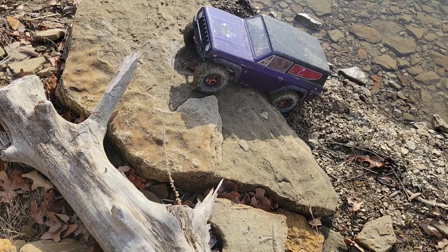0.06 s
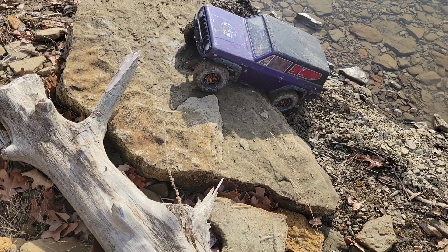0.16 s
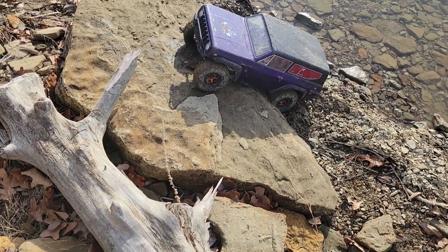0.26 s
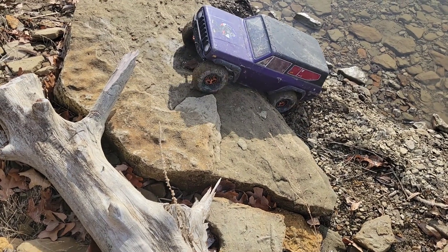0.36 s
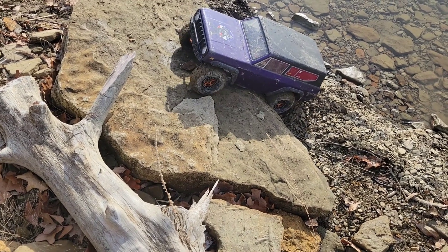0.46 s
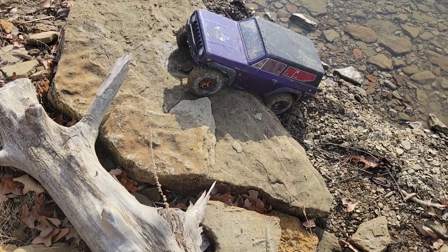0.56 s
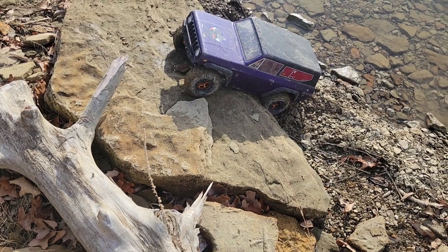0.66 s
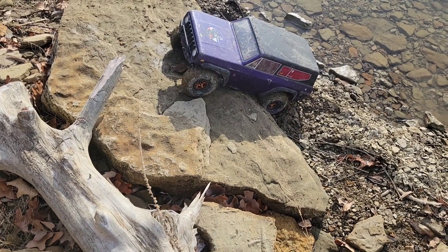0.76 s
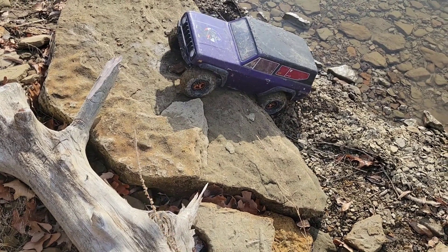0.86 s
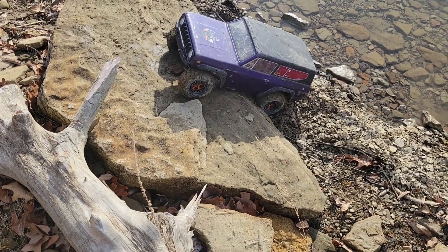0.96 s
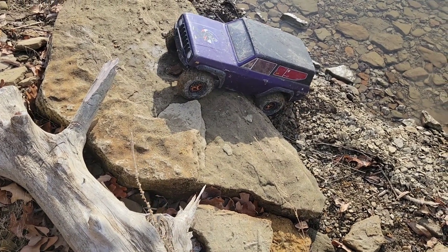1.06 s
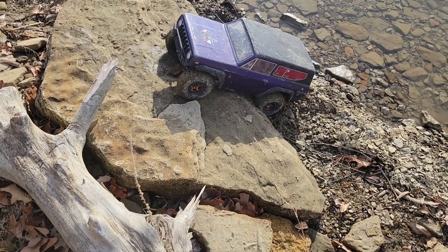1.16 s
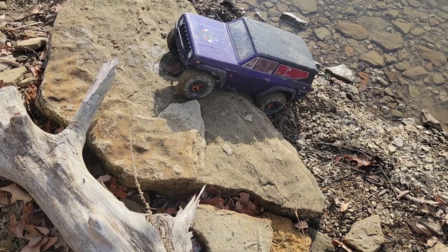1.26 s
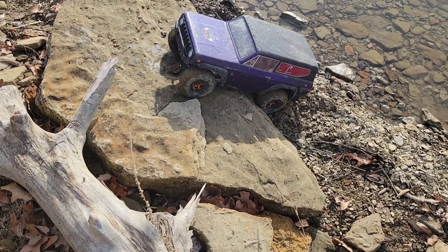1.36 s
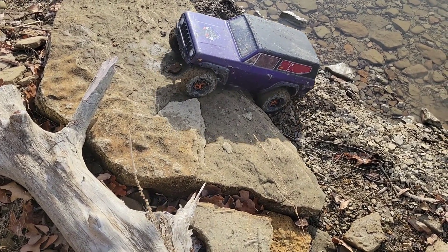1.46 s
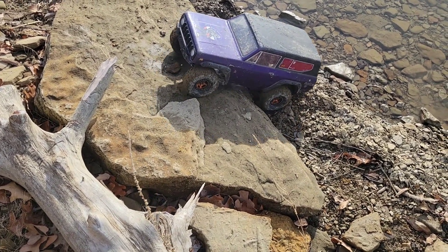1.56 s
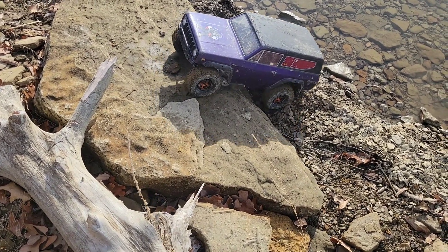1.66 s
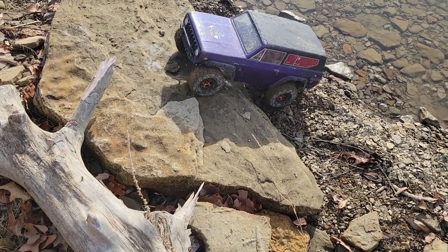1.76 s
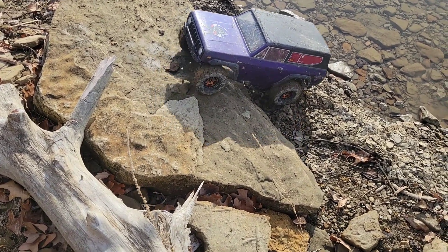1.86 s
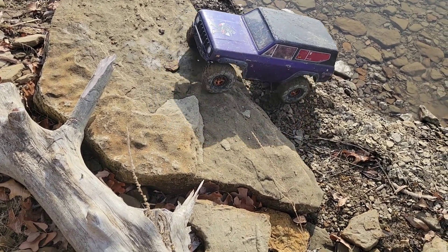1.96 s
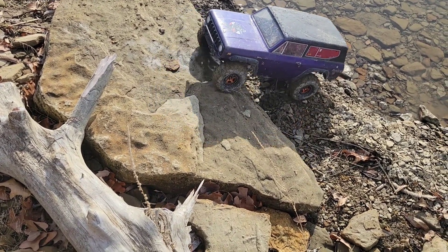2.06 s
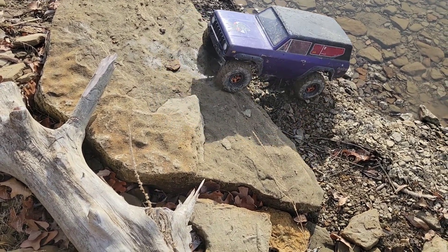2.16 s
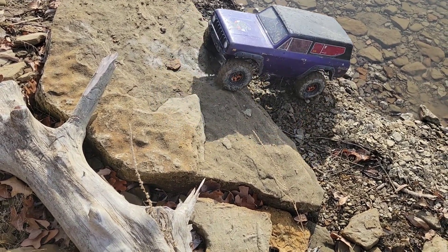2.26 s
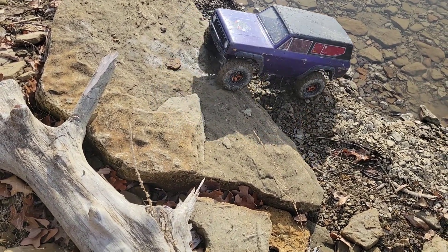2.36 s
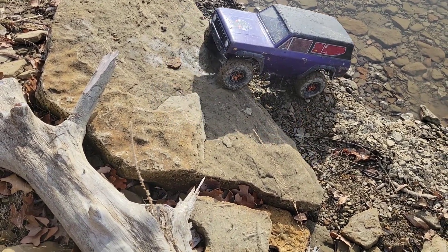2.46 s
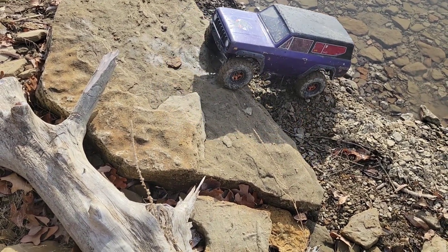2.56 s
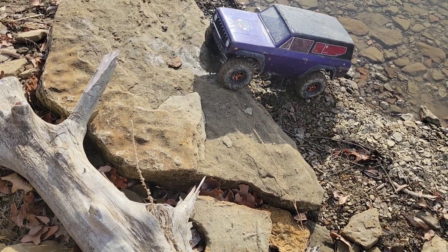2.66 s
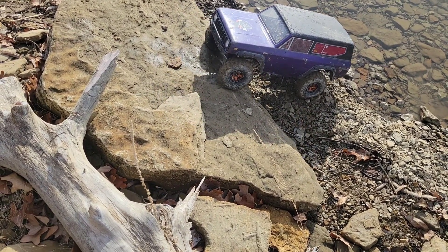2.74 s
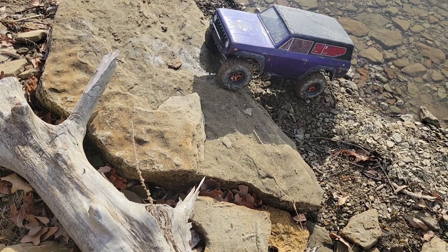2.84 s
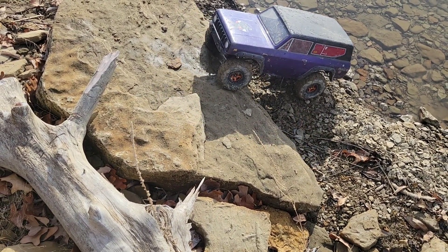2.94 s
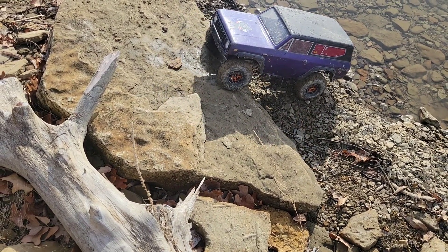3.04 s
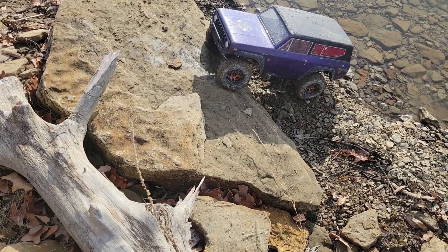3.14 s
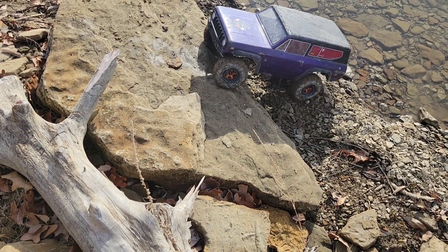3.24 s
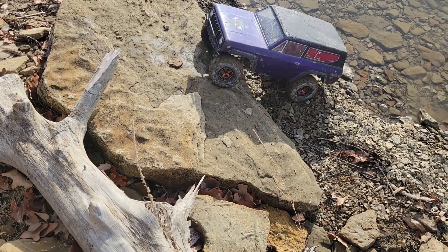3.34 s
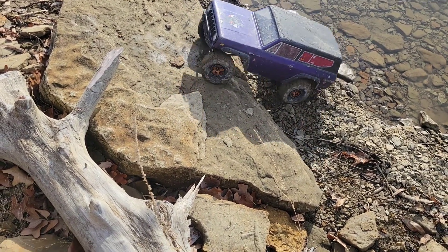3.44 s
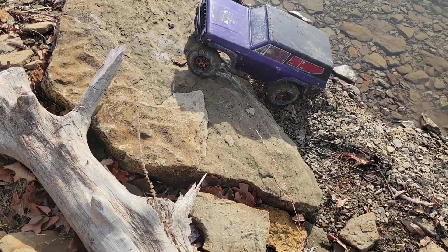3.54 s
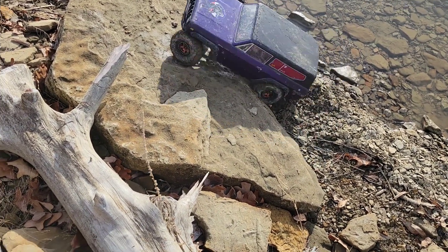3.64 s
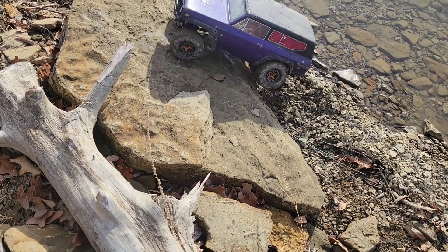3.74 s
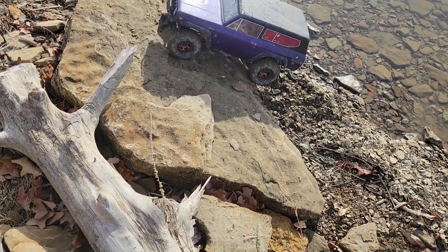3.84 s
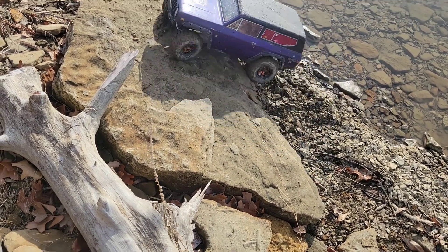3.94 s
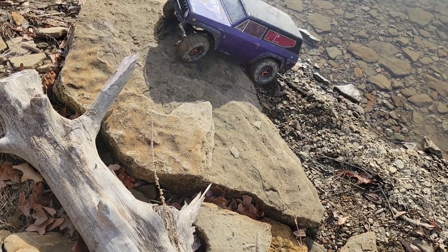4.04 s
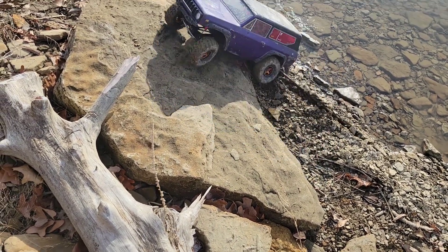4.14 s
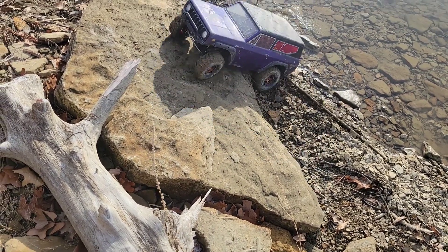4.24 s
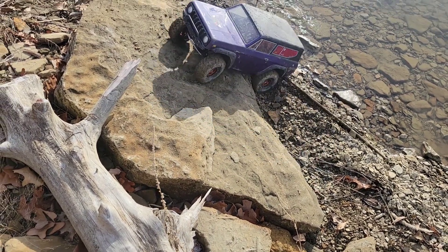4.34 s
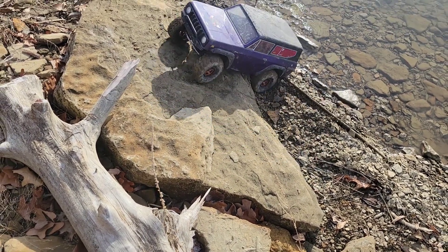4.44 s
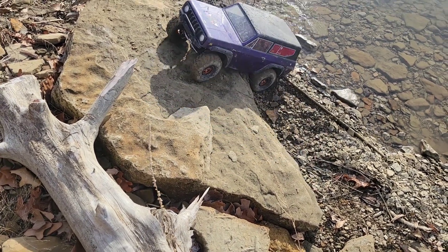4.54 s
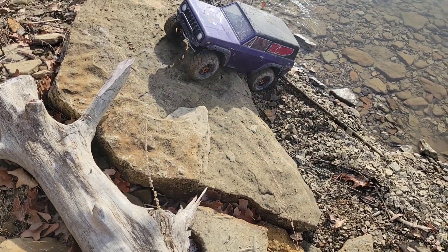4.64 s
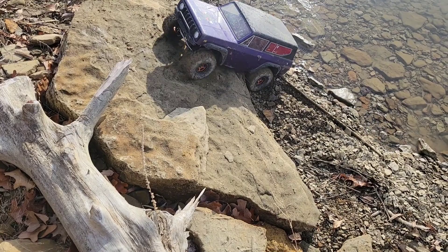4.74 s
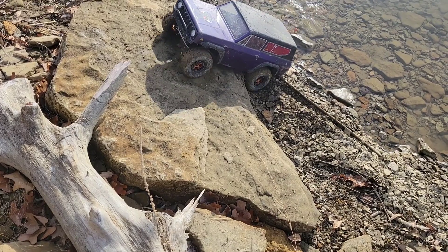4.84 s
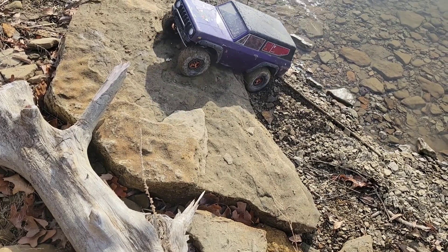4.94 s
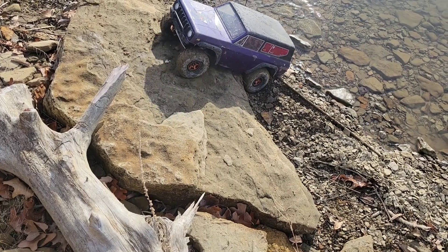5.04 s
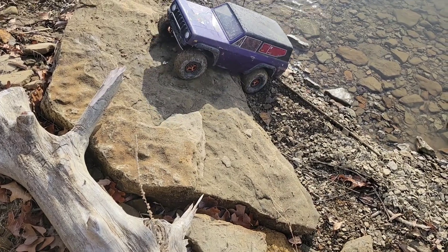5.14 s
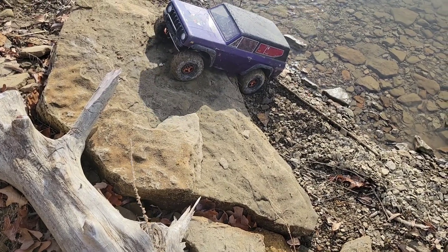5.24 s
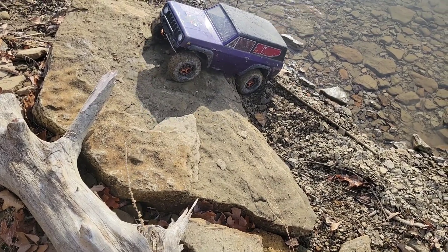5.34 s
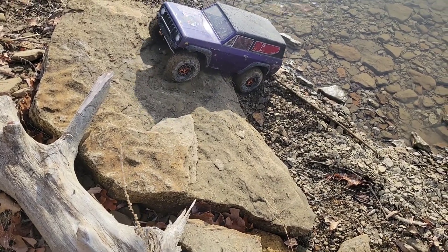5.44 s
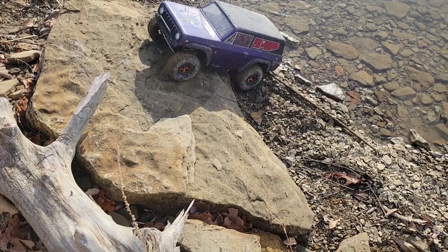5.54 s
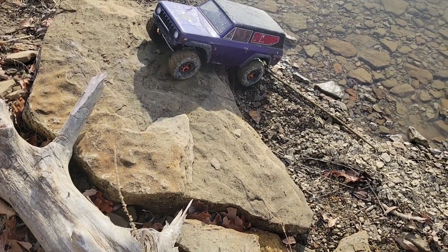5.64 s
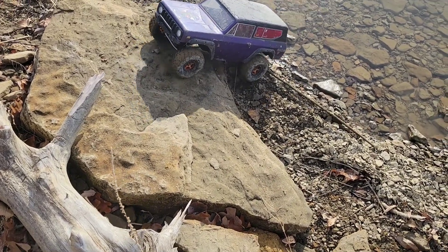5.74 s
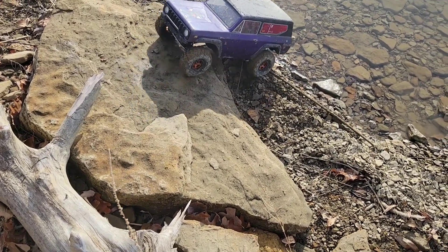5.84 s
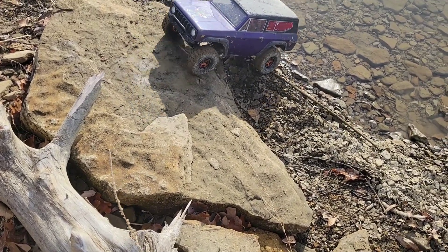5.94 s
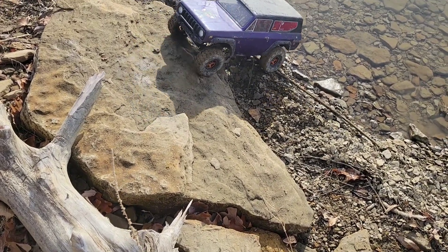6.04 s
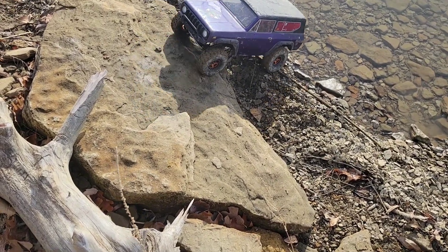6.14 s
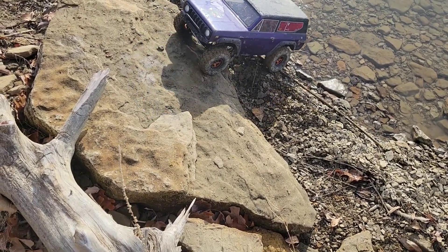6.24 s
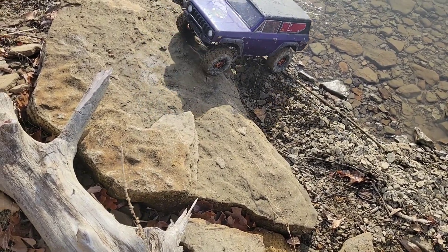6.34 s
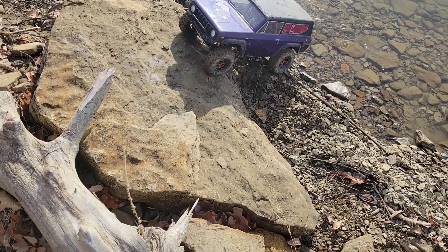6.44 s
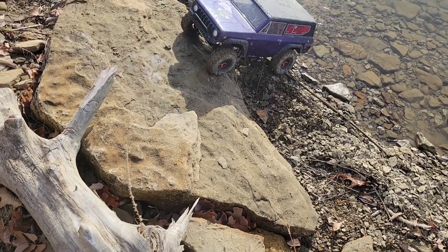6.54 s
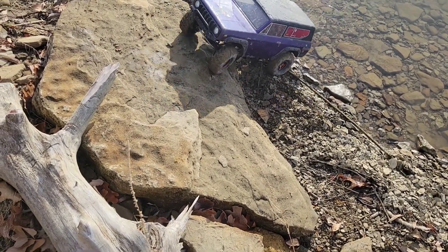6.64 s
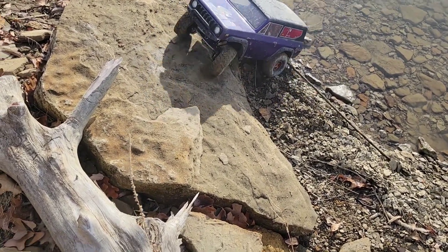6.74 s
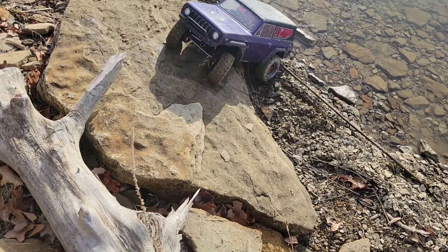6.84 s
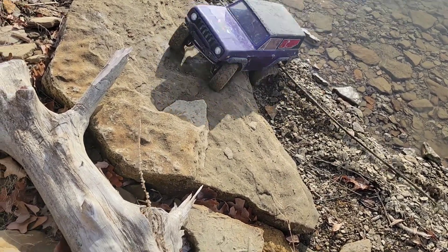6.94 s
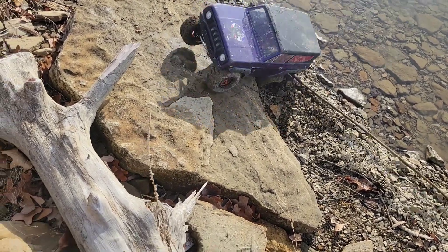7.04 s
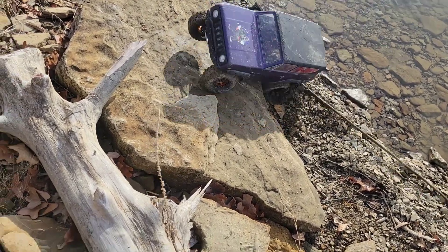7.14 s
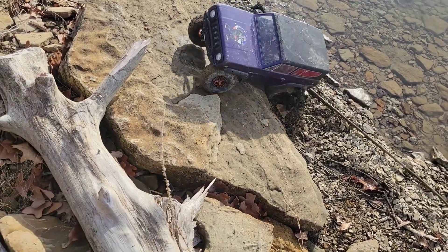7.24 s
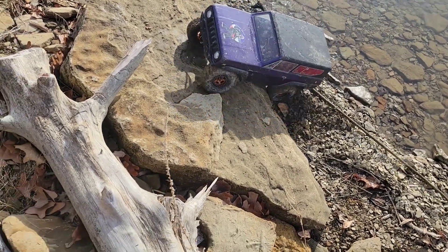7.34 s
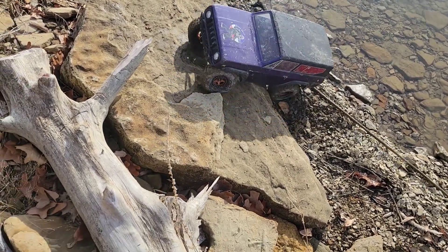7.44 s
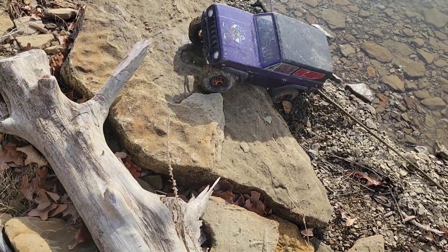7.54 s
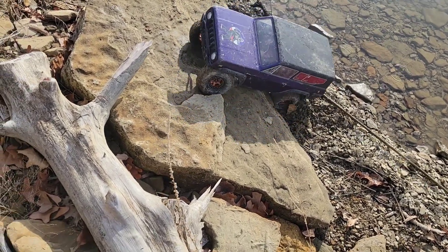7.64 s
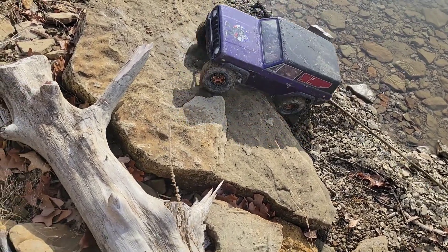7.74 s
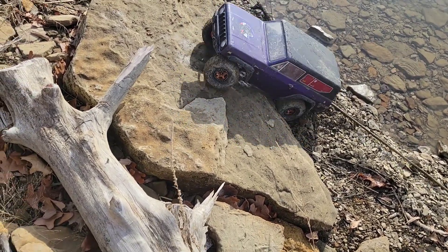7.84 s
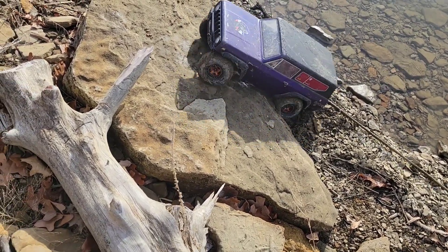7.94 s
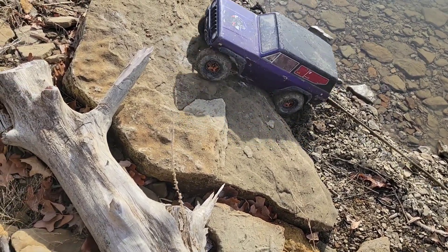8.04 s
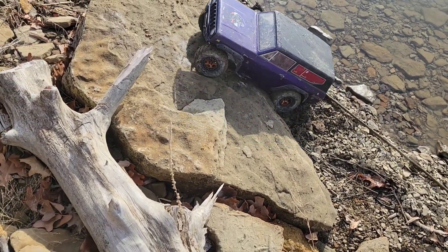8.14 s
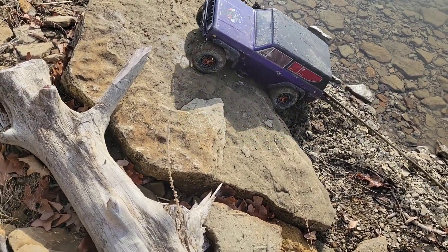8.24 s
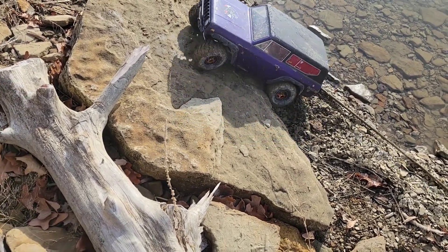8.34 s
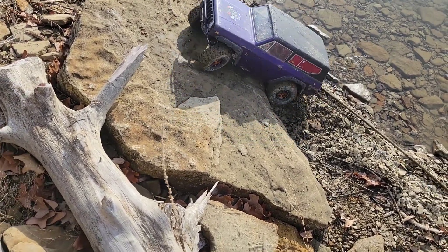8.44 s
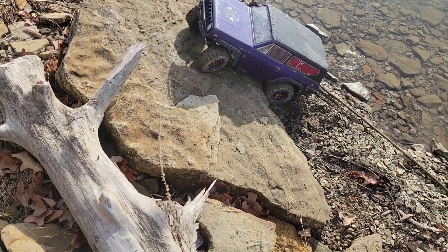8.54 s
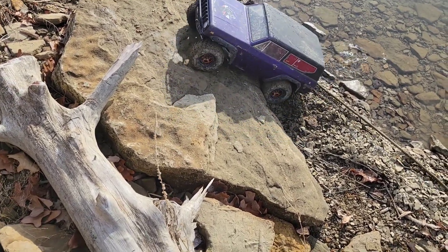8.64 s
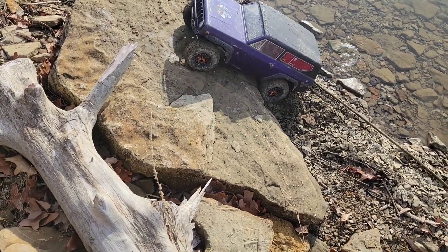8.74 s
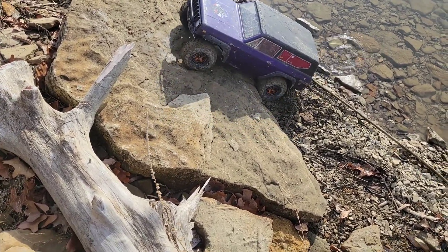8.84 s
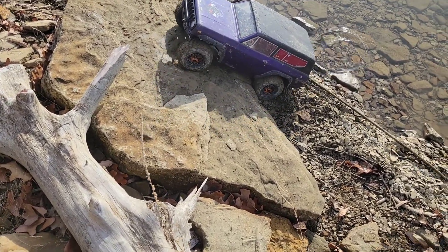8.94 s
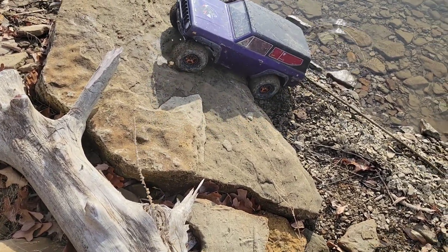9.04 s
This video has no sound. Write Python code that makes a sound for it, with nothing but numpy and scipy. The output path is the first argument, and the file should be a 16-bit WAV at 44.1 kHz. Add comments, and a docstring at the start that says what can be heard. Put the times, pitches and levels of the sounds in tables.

```python
"""Toy truck on a rock slab

At the water's edge a small remote-controlled truck claws at stone, its motor running in bursts, before two
microphone ports. Shaft orders glide with motor speed over filtered-noise rattle; gears squeal in short sine glides.
A sine whistles at part throttle, coloured noise makes tyre hiss, trickle and distant shore rumble,
and short decaying noise makes grit ticks and knocks."""
import sys
import numpy as np
from scipy import signal
from scipy.fft import rfft, irfft, next_fast_len
from scipy.io import wavfile
from scipy.ndimage import uniform_filter1d

SR = 44100
rng = np.random.default_rng(int(sys.argv[2]) if len(sys.argv) > 2 else 0)


def put_to_file(sound):
    """Save the sound as 16-bit audio at rate SR, in the file named by the first command-line argument."""
    columns = np.atleast_2d(sound).T  # one column per channel
    safe = np.clip(columns, -1, 1)
    whole_steps = np.round(safe * 32767)
    wavfile.write(sys.argv[1], SR, whole_steps.astype(np.int16))


N = 400869
TIME_S = np.arange(N) / SR


def from_db(db):
    """Amplitude gain of a level in dB."""
    return 10 ** (np.asarray(db) / 20)


def rms_one(x):
    """Scale a signal to rms 1."""
    return x / np.sqrt(np.mean(x ** 2) + 1e-20)


def in_time(rows):
    """Columns of a table whose first column is t/s, joined by straight lines, one value per sample."""
    s, *columns = np.transpose(rows)
    return [np.interp(TIME_S, s, column) for column in columns]


def in_spans(tables):
    """Columns of several tables, with -130 dB as silence between them."""
    out = np.full((len(tables[0][0]) - 1, N), -130.)
    for rows in tables:
        inside = (TIME_S >= rows[0][0]) & (TIME_S <= rows[-1][0])
        out[:, inside] = np.array(in_time(rows))[:, inside]
    return out


def window(on, off, fade):
    """1 between two moments, with straight fades outside them."""
    return np.interp(TIME_S, [on - fade, on, off, off + fade], [0, 1, 1, 0])


def at_hz(points, hz):
    """Read a spectrum table on a log frequency axis."""
    table_hz, values = np.array(points).T
    return np.interp(np.log(np.maximum(hz, 1)), np.log(table_hz), values)


def filtered(x, response):
    """Multiply by response(Hz) in the frequency domain."""
    size = next_fast_len(N + 4096)
    hz = np.arange(size // 2 + 1) * SR / size
    return irfft(rfft(x, size) * response(hz), size)[..., :N]


def drift(rate_hz):
    """Slow random wander of rms 1: white noise through two equal one-pole smoothers."""
    r = np.exp(-2 * np.pi * rate_hz / SR)
    settled = signal.lfilter([1], [1, -2 * r, r * r], rng.standard_normal(N + SR))[SR:]
    return rms_one(settled)


def resonate(x, hz, width_hz):
    """One resonance, a two-pole filter with gain 1 on top."""
    r = np.exp(-np.pi * width_hz / SR)
    zeros = np.array([1, 0, -1]) * (1 - r * r) / 2
    return signal.lfilter(zeros, [1, -2 * r * np.cos(2 * np.pi * hz / SR), r * r], x)


# likeness of spread-out sound at the two microphone ports: f/Hz, common share of power (0-1)
COMMON_SHARE = [(100, .99), (400, .96), (1000, .92), (2700, .86), (4000, .6), (8000, .45), (15000, .4)]


def spread_noise():
    """White noise from a spread-out source: the ports hear it alike in the bass, less so in the treble."""
    share = lambda hz: np.clip(at_hz(COMMON_SHARE, hz), 0, 1)
    common = filtered(rng.standard_normal(N), lambda hz: np.sqrt(share(hz)))
    return common + filtered(rng.standard_normal((2, N)), lambda hz: np.sqrt(1 - share(hz)))


def coloured(spectrum, grain_db, patchy_db, treble_db=0):
    """Grainy noise of a given spectrum, treble and lower part patchy on their own; rms 1."""
    rough = spread_noise() * from_db(grain_db * drift(300))
    treble = filtered(rough, lambda hz: 1 / (1 + (10500 / np.maximum(hz, 1)) ** 8))
    lower = (rough - treble) * from_db(0.54 * patchy_db * drift(23))
    mixed = treble * from_db(treble_db + patchy_db * drift(26)) + lower
    return rms_one(filtered(mixed, lambda hz: from_db(at_hz(spectrum, hz))))


def rattle(modes, flutter_db, flutter_rate, swell_db):
    """Tooth noise rings each mode of a part, each one fluttering and swelling on its own; rms 1."""
    out, teeth = 0, [spread_noise(), spread_noise()]
    for k, (hz, width_hz, level_db) in enumerate(modes):
        shaken = teeth[k % 2] * from_db(flutter_db * drift(flutter_rate) + swell_db * drift(6.0))
        # two passes, each widened because together they ring narrower
        ringing = resonate(resonate(shaken, hz, 1.93 * width_hz), hz, 1.93 * width_hz)
        out = out + from_db(level_db) * rms_one(ringing)
    return rms_one(out)


# colour of the distant shore, rumble and faint wash: f/Hz, relative level/dB per Hz
SHORE_COLOUR = [(12, -55), (25, -29), (60, -7), (78, -6), (89, 0), (100, -11.5), (120, -13.5), (132, -6.5),
                (142, -17), (164, -26), (211, -24.5), (256, -40), (628, -53), (1300, -65.5), (1670, -59.5),
                (4460, -52.5), (8990, -62), (16200, -76)]
SHORE_DB = -48


def shore():
    """Distant low rumble over a faint wash, as steady coloured noise."""
    return from_db(SHORE_DB) * coloured(SHORE_COLOUR, grain_db=2.0, patchy_db=-1.7)


# spinning tyres break loose and grip again in turn, one table a burst:
# t/s of breaking loose, swing of the can's ring/dB, speed swing (share)
WHEELSPIN = [
    [(.065, 7, 0.00042), (.17, 4.5, 0.0036), (.265, 0, 0.0018), (.34, 8, 0.00025)],
    [(3.6, -0.5, 0.0078), (3.71, 1.5, 0), (3.83, 3, 0.027), (3.92, 0, 0.015), (4.01, 2.5, 0.0088),
     (4.09, 4, .01), (4.23, 2, 0.0032), (4.34, 7, .015), (4.45, 1.5, .01), (4.585, 1.5, .01),
     (4.72, -1, 0.014), (4.79, 0, 0.012), (4.865, 3.5, 0.0013)],
    [(6.625, -5, 0.00055), (6.74, 3, 0.011), (6.85, 4.5, .01), (7.03, 1.5, .01), (7.19, 3.5, .01),
     (7.30, 0.5, 0.041), (7.45, 2.5, .045), (7.625, 0.5, .052), (7.77, 6.5, .052), (7.90, 3.5, 0.055),
     (8.03, 1, 0.058), (8.16, 3.5, 0.037), (8.3, 1.5, 0.022), (8.43, 4, 0.004)],
]
SPEED_LAG_S = .025   # the heavy drive line follows the grip late


def wheelspin():
    """Grip-and-slip beat, one cosine cycle a slip: swing of the can's ring (dB) and of speed (share)."""
    ring_db, swing = 0, 0
    for slips in WHEELSPIN:
        s = np.array(slips)[:, 0]
        cycles = np.interp(TIME_S, s, np.arange(len(s)))
        beat = window(s[0], s[-1], .04) * np.cos(2 * np.pi * cycles)
        depth_db, share = in_time(slips)
        ring_db, swing = ring_db + depth_db * beat, swing + share * beat
    return ring_db, np.roll(swing, int(SPEED_LAG_S * SR))


# drive line, one table a burst:
# t/s, motor speed/(turns per s) before wheelspin, gear case level/dB, whine level/dB over the chassis rattle
DRIVE = [
    [(0.0, 162, -35.5, 2), (0.05, 184, -33.5, 5), (0.1, 180, -34.5, -7), (0.19, 158, -35.5, -3),
     (0.222, 141, -36, 8), (0.26, 140, -34.5, -12), (0.308, 134, -37.5, 7), (0.355, 115, -35.5, 2.5),
     (0.4, 70, -46.5, -2), (0.45, 60, -73, -7), (0.5, 45, -70, -12)],
    [(0.774, 10, -96.5, -13), (0.784, 16, -73, -12), (0.81, 24, -73.5, -15), (0.86, 34, -71, -12),
     (0.92, 28, -75.5, -18), (1.07, 20, -73, -24), (1.135, 28, -58.5, 0.5), (1.25, 25, -62.5, -3),
     (1.45, 19, -64, -4), (1.55, 29, -53, -19), (1.63, 25, -63, -7), (1.77, 20, -69, -34),
     (1.87, 48, -50.5, -4), (1.94, 54, -49, -0.5), (1.98, 50, -61.5, -21), (2.03, 46, -61, -17),
     (2.1, 43, -59.5, -2), (2.2, 36, -83, 7)],
    [(3.03, 4.4, -104, -15), (3.11, 7, -100, -12), (3.14, 20.7, -66, -14), (3.17, 32, -58.5, -24),
     (3.26, 45, -50.5, -1.5), (3.32, 54, -49.5, 0.5), (3.37, 81, -43, 3.5), (3.4, 90, -42.5, 7.5),
     (3.45, 105, -42.5, -5), (3.49, 134, -37, 0), (3.55, 181, -35.5, 1), (3.62, 236, -34.5, 6.5),
     (3.7, 240, -31, -4.5), (3.74, 260, -30.5, 2), (3.79, 250, -30, 1.5), (3.86, 254, -30, -1.5),
     (3.93, 260, -31, 0), (4.1, 252, -30, -0.5), (4.2, 274, -29.5, -12), (4.3, 245, -30, 1.5),
     (4.42, 239, -29.5, -5.5), (4.54, 246, -30.5, 5), (4.65, 253, -29.5, -1.5), (4.79, 243, -30, -1),
     (4.86, 195, -32, -2), (4.93, 135, -40, -2), (5.0, 90, -78, -8)],
    [(5.22, 10.3, -97, -12), (5.262, 40, -61.5, -17), (5.3, 60, -49, -19), (5.37, 90, -40, -21),
     (5.42, 76, -41, 6), (5.47, 46, -48, -4), (5.52, 25, -73, 1), (5.55, 34, -54.5, -12),
     (5.6, 46, -46.5, -29), (5.69, 51, -48.5, 2.5), (5.74, 71, -42.5, 3), (5.77, 75, -43.5, 5.5),
     (5.81, 62, -43.5, 1.5), (5.87, 48, -77, -9)],
    [(6.51, 50, -81.5, -7), (6.55, 59, -60, -23), (6.58, 105, -42, 0), (6.63, 195, -31, -15),
     (6.69, 244, -31.5, 4), (6.78, 253, -29.5, -9), (6.86, 261, -28, -2), (6.91, 242, -28.5, -8),
     (6.995, 236, -30, 2), (7.03, 260, -30, 0.5), (7.2, 259, -31, 0.5), (7.3, 249, -30, -1),
     (7.5, 245, -31, 0.5), (7.75, 244, -30, -5), (8.18, 245, -30, -1), (8.27, 226, -33, 5.5),
     (8.32, 233, -29.5, -1.5), (8.4, 215, -33, 5), (8.45, 228, -30, 5), (8.52, 160, -37.5, 1.5),
     (8.56, 120, -49.5, -13), (8.64, 120, -54.5, -19), (8.68, 45, -63, -10)],
    [(8.92, 8.2, -78, -11), (8.98, 37, -55, -29), (9.03, 41, -51, -13), (9.09, 46, -52, 3)],
]


def drive_line():
    """Motor speed with its wheelspin, the turns it adds up to, and the can's ring swing in dB."""
    ring_db, swing = wheelspin()
    steady_speed = in_time([row[:2] for burst in DRIVE for row in burst])[0]
    speed = steady_speed * (1 + swing)
    return speed, np.cumsum(speed) / SR, ring_db


# shaft orders: cycles per motor turn, level/dB at 100 turns per s, rise/dB per doubling of speed
SHAFT_ORDERS = [(2, -16, 2), (3, -14, 7), (3.95, -10, 3), (6, -7, 2), (8, -18, 2), (11.8, -14, 5),
                (15.2, -18, 6), (10.3, -2.5, -1), (20.6, -2, -3.5), (30.9, -12, -4), (41.2, -16, -4)]
# what the body lets out of the whine: f/Hz, level/dB
BODY_COLOUR = [(180, -7), (260, 3), (420, -12), (560, 1), (680, -6), (800, -2), (950, 5), (1200, -2),
               (1550, 3), (2000, -7), (2500, 5), (2900, 5), (3400, -1), (3850, 6.5), (4100, -17.5),
               (4600, -24.5)]


def whine(speed, turns):
    """Commutator and gear orders: wavering sines, loud where they cross a resonance of the body."""
    out = 0
    for order, level_db, rise_db in SHAFT_ORDERS:
        # play in the gears shakes the phase, more at high pitch
        waver = .00046 * order * speed * drift(30)
        body_db = at_hz(BODY_COLOUR, order * speed)
        flicker_db = 2.2 * drift(12) + 1.8 * drift(50)
        gain = from_db(level_db + rise_db * np.log2(speed / 100) + body_db + flicker_db)
        out = out + gain * np.sin(2 * np.pi * order * turns + waver)
    return out


# plastic chassis modes: f/Hz, nominal width/Hz, level/dB
CHASSIS = [(198, 57, -4), (362, 59, -2.5), (532, 110, 0), (800, 110, -2.5), (924, 93, -1.5), (1170, 59, -1),
           (1504, 230, 3.5)]
# thin body shell modes: f/Hz, nominal width/Hz, level/dB
SHELL = [(560.2, 27, 0), (943, 50, -1), (1430, 40, -17.5), (1633, 29, -8), (2258, 40, -14), (2720, 45, -11),
         (2960, 40, -14), (3140, 45, -14)]
GRIP_WHINE, GRIP_LEAD_S = 1.15, .02   # dB per dB that the can's ring sinks; how far ahead of it


def chassis(speed, turns, whine_db, ring_db):
    """Rattling plastic chassis and thin shell, with the whine of loaded gears swelling as tyres bite."""
    grip_db = -GRIP_WHINE * np.roll(ring_db, -int(GRIP_LEAD_S * SR))
    out = rattle(CHASSIS, flutter_db=1.75, flutter_rate=86, swell_db=1.5)
    out = out + from_db(whine_db + grip_db) * whine(speed, turns)
    # the cogging of a slow motor rings the shell clearest
    shell_db = -5 - 3.5 * np.log2(speed / 100)
    return out + from_db(shell_db) * rattle(SHELL, flutter_db=2.5, flutter_rate=15.0, swell_db=2.5)


# gear case modes: f/Hz, nominal width/Hz, level/dB
GEAR_CASE = [(2062, 270, -6.5), (2404, 220, -5.5), (2822, 386, -1.5), (3588, 500, -2)]
# ring of the motor can: f/Hz, nominal width/Hz, level/dB
MOTOR_CAN = [(3783, 60, 6), (3860, 44, -0.5), (3967, 45, 0)]
# how loudly the can rings against the gear case, before a common cut of 3 dB: t/s, level/dB
CAN_RING = [(0, -0.5), (.4, -2.5), (.8, 6), (1.12, 3), (1.25, -8), (1.7, -7.5), (1.85, 2.5), (2.1, 1.5),
            (3.2, -7), (3.7, -5), (3.95, 4.5), (4.8, 0.5), (5.3, 0.5), (5.45, -3.5), (5.6, -9), (5.76, -2),
            (6.6, 8), (6.95, -3), (7.25, 4.5), (8.12, 2), (8.25, -8), (8.42, -5), (9.09, 6.5)]
GRIP_CASE = .3   # dB that the loaded gears swell per dB that the can's ring sinks
CAN_THROB_DB, SPUR_RATIO = 4.5, 4.1   # the spur gear runs out of round: swing, motor turns per turn of it


def gear_case(speed, turns, ring_db):
    """Gear case rattle, and the motor can that rings out as the wheels break loose."""
    case = from_db(-GRIP_CASE * ring_db) * rattle(GEAR_CASE, flutter_db=1.8, flutter_rate=50, swell_db=1.2)
    throb_db = CAN_THROB_DB * np.sin(2 * np.pi * turns / SPUR_RATIO)
    # share by which the speed exceeds its quarter-second mean
    surge = np.clip(speed / uniform_filter1d(speed, size=SR // 4) - 1, -.04, .04)
    can_db = in_time(CAN_RING)[0] - 3.0 + 27.0 * surge + ring_db + throb_db
    return case + from_db(can_db) * rattle(MOTOR_CAN, flutter_db=3.0, flutter_rate=41, swell_db=2.25)


# tyre hiss on stone: f/Hz, relative level/dB per Hz
HISS_COLOUR = [(3000, -43.5), (4300, -15), (4600, -12.5), (5300, 1.5), (7900, 1.5), (8700, -1), (10500, -8),
               (12200, 4.5), (13600, -0.5), (15100, 10), (16500, -1.5)]


def tyre_hiss(speed):
    """Tyres hiss on stone: grainy noise, brighter when fast."""
    return coloured(HISS_COLOUR, grain_db=1.15, patchy_db=2.5, treble_db=6.3 * np.log2(speed / 250))


# how the truck sits and faces, one row a burst: chassis gain/dB, hiss gain/dB, left port over right/dB
STANCE = [(0.96, 2, 2), (-0.5, 5, 2), (0.42, 1.2, 1.75), (-3.5, 0, 3.5), (0.1, 0.55, 1.4), (-6.5, 4.5, 2)]
# tyres skid as the truck settles: t/s, length/s, hiss level/dB
SKIDS = [(2.089, 0.1, -65.5), (8.575, 0.083, -49)]
FULL_SPEED = 250   # turns per s
# level against the gear case: dB at full speed, dB more per halving of speed
CHASSIS_LAW, HISS_LAW = (-5, 3.35), (-1.83, -3.1)


def truck(speed, turns, ring_db):
    """Motor, gears, body and tyres, balanced by speed and by how the truck faces the ports."""
    halvings = np.log2(FULL_SPEED / speed)
    _, case_db, whine_db = in_spans(DRIVE)
    stance_spans = [[(burst[0][0], *row), (burst[-1][0], *row)] for burst, row in zip(DRIVE, STANCE)]
    chassis_stance_db, hiss_stance_db, facing_db = in_spans(stance_spans)
    chassis_db = case_db + CHASSIS_LAW[0] + CHASSIS_LAW[1] * halvings + chassis_stance_db
    hiss_db = case_db + HISS_LAW[0] + HISS_LAW[1] * halvings + hiss_stance_db
    hiss = tyre_hiss(speed)
    running = from_db(chassis_db) * chassis(speed, turns, whine_db, ring_db)
    running = running + from_db(case_db) * gear_case(speed, turns, ring_db) + from_db(hiss_db) * hiss
    side_db = np.where(case_db > -120, facing_db, 0) / 2 * [[1], [-1]]
    skids = sum(from_db(db) * window(s, s + length, 0.0081) for s, length, db in SKIDS)
    return from_db(side_db) * running + skids * hiss


# the gear case squeals: t/s, peak level/dB, length/s, start f/Hz, end f/Hz
SQUEALS = [(0.049, -19, 0.062, 3870, 3636), (3.477, -35, 0.027, 3810, 3770),
           (3.531, -28.5, 0.029, 3730, 3750), (4.863, -17.5, 0.024, 3896, 3860),
           (5.305, -34.5, 0.044, 3900, 3850), (5.743, -37, 0.03, 3944, 3900),
           (6.618, -14, 0.0077, 3960, 3810), (6.715, -12.5, 0.01, 3770, 3760),
           (7.619, -20.5, 0.035, 3840, 4010), (8.477, -13.5, 0.0087, 3875, 3860),
           (8.509, -23, 0.014, 3870, 3830), (8.563, -38.5, 0.042, 3920, 4100),
           (8.58, -33.5, 0.069, 4160, 4100), (8.623, -22, 0.025, 3990, 3346)]


def squeals():
    """Gear case squeals: short gliding sines, quick to rise and slower to fall."""
    out = np.zeros(N)
    for s, peak_db, length, start_hz, end_hz in SQUEALS:
        u = np.linspace(0, 1, int(length * SR))
        tone = np.sin(2 * np.pi * np.cumsum(start_hz + (end_hz - start_hz) * u) / SR)
        out[int(s * SR):][:len(u)] += from_db(peak_db) * np.sin(np.pi * u ** 0.44) * tone
    return out


DB_PER_DOUBLED_RING = 39   # harder hits ring longer: t60 holds for a body peak of -43 dB


def ticks(events, width, t60):
    """Cracks of noise that die fast: a broad resonance (width per Hz of colour) and a bright edge."""
    length = 2600
    out, t = np.zeros(N + length), np.arange(length) / SR
    for s, peak_db, hz, treble_db in events:
        ring_s = t60 * 2 ** ((peak_db + 43.0) / DB_PER_DOUBLED_RING)
        crack = rng.standard_normal(length) * from_db(-60 * t / ring_s)
        body = resonate(crack, hz, width * hz)
        edge = resonate(resonate(crack, 13300, 4700), 14600, 4400)
        hit = body / abs(body).max() + from_db(treble_db) * edge / abs(edge).max()
        out[int(s * SR):][:length] += from_db(peak_db) * hit
    return out[:N]


FINE_GRIT_PER_S, FINE_GRIT_DB = 2, -71   # mean rate, faintest body peak


def fine_grit():
    """Faint ticks at chance moments, of chance size and colour."""
    draw = rng.random((100, 3))
    s = np.cumsum(-np.log(1 - draw[:, 0])) / FINE_GRIT_PER_S
    return [(a, FINE_GRIT_DB + 8 * b, 1500 * 2.4 ** c, -24) for a, b, c in zip(s, *draw[:, 1:].T) if a < N / SR]


# grit ticks on stone: t/s, body peak level/dB, colour f/Hz, treble level/dB over the body peak
TICKS = [(.345, -30, 6000, -17), (.655, -64, 7000, -18), (.695, -61.5, 5300, -21), (.713, -57.5, 7000, -16),
         (0.8135, -52, 3940, -22), (0.848, -51, 3630, -27), (2.0926, -40.5, 4140, -31.5),
         (2.4049, -53, 2500, -8), (2.4638, -47, 890, -16.5), (2.4992, -54.5, 1790, -16),
         (2.5775, -41.5, 1710, -23), (2.7387, -48.5, 1560, -22), (4.811, -40.5, 7000, 10),
         (4.876, -46, 7000, 8), (4.948, -52, 7000, 14), (4.972, -55, 7000, 15), (4.995, -56, 6000, 12),
         (5.028, -58.5, 7000, 11), (5.052, -62, 7000, 11), (5.143, -72, 7150, 6), (5.198, -53, 4970, -6),
         (5.3063, -45.5, 3840, -25), (5.387, -33, 2300, -40), (5.5, -62, 7000, 12), (5.685, -52, 7000, 13),
         (5.7094, -39, 2707, -24), (5.8094, -41, 3860, 6), (5.8326, -39, 3600, 7), (5.8494, -39.5, 3460, 3),
         (5.9354, -43, 3820, -1), (5.9668, -16, 4640, -7), (6.012, -50, 2800, -23), (6.09, -55, 2300, -19),
         (6.13, -40.5, 3270, -3), (6.165, -46, 800, -18), (6.2118, -46, 3131, -12.5),
         (6.31, -63, 6000, -5.5), (6.398, -53, 3340, -20), (6.437, -52, 3840, -16),
         (8.98, -45.5, 3660, -29)]


def grit():
    """Grit ticks on stone, among fine chance ticks."""
    return ticks(TICKS + fine_grit(), width=2.9, t60=0.019)


# grit and water trickle off the truck when it stops: stop t/s, level/dB, held/s
TRICKLE = [(0.42, -72, 0.021), (2.15, -68.5, 0.016), (4.97, -61.5, 0.13), (5.82, -54, 0.25),
           (6.35, -73, 0.15), (8.62, -62, 0.14)]
# trickle colour: f/Hz, relative level/dB per Hz
TRICKLE_COLOUR = [(150, -51), (250, -8.5), (578, -8), (900, -14), (1680, -10), (1860, -18), (3600, -23),
                  (6650, -20), (10100, -38.5), (15100, -24.5), (16200, -17)]
TRICKLE_FALL_DB_PER_S, TRICKLE_FLOOR_DB = 91, -70.5


def trickle():
    """Patchy noise that holds and then dies away after each stop, over a faint constant floor."""
    gain = from_db(TRICKLE_FLOOR_DB)
    for s, db, held in TRICKLE:
        fallen_db = TRICKLE_FALL_DB_PER_S * np.maximum(TIME_S - s - held, 0)
        gain = gain + window(s, 99, 0.01) * from_db(db - fallen_db)
    return gain * coloured(TRICKLE_COLOUR, grain_db=-1.0, patchy_db=4.5)


# chopped motor current at part throttle: on t/s, off t/s,
# middle tone level/dB and level/dB of each side tone, both at 30 turns per s
PART_THROTTLE = [(.78, 1.15, -84, -75), (1.18, 2.0, -74, -75), (3.066, 3.62, -66.5, -69),
                 (5.258, 5.81, -66, -76), (6.53, 6.587, -68.5, -72), (8.938, 9.2, -65.5, -69)]
WHISTLE_HZ, WHISTLE_RISE_DB, WHISTLE_FADE_S = 8010, 3.5, .03   # rise per doubling of speed


def whistle(speed, turns):
    """The chopped current swells five times a turn, once per rotor pole, which splits off two side tones."""
    carrier = np.sin(2 * np.pi * WHISTLE_HZ * TIME_S)
    middle, sides = 0, 0
    for on, off, middle_db, side_db in PART_THROTTLE:
        sounding = window(on, off, WHISTLE_FADE_S)
        middle = middle + from_db(middle_db) * sounding
        sides = sides + from_db(side_db) * sounding
    poles = np.cos(2 * np.pi * 5 * turns)
    swelling = middle * from_db(3.0 * drift(8)) + 2 * sides * from_db(1.5 * drift(8)) * poles
    return from_db(WHISTLE_RISE_DB * np.log2(speed / 30)) * carrier * swelling


# the body knocks on the slab: t/s, body peak level/dB, colour f/Hz
KNOCKS = [(1.978, -33.5, 1018), (2.032, -34.5, 322), (2.117, -36.5, 1070), (2.718, -48, 443),
          (5.387, -24.5, 940), (5.969, -40.5, 483), (6.012, -37.5, 1160)]
KNOCK_TREBLE_DB = -49   # bright edge over the body peak


def knocks():
    """The truck's body knocks on the slab: narrower, longer cracks than the grit."""
    return ticks([knock + (KNOCK_TREBLE_DB,) for knock in KNOCKS], width=0.24, t60=0.045)


# tyres scrub as the truck slews: on t/s, off t/s, level/dB, f/Hz, width/Hz (halved for the mode's nominal width)
SCRUB = (8, 8.5, -35, 1657, 704.5)


def scrub():
    """Tyres scrub as the truck slews: one broad fluttering resonance of noise."""
    on, off, level_db, hz, width_hz = SCRUB
    rubbing = rattle([(hz, width_hz / 2, 0)], flutter_db=4.5, flutter_rate=33, swell_db=1.5)
    return from_db(level_db) * window(on, off, .05) * rubbing


# delay of the right microphone port: f/Hz, lag/samples
RIGHT_LAG = [(60, 15), (200, 14), (860, 7.15), (1900, 14.87), (4000, 13.8), (8000, 6.4), (14000, 10)]
# level of the left port over the right: f/Hz, level/dB
LEFT_OVER_RIGHT = [(30, -0.5), (70, -3.5), (120, 1.5), (240, -5.5), (480, 0), (950, -1.5), (1890, 2.5),
                   (3770, -6.5), (7520, 1.5), (15000, -6.5)]


def ports(x):
    """The right port hears everything late, and the handset shades each port differently."""
    late = lambda hz: np.exp(-2j * np.pi * hz * at_hz(RIGHT_LAG, hz) / SR * [[0], [1]])
    shade = lambda hz: from_db(at_hz(LEFT_OVER_RIGHT, hz) / 2 * [[1], [-1]])
    return filtered(x, lambda hz: late(hz) * shade(hz))


def scene():
    """The shore, the truck and the stones reach the two microphone ports."""
    speed, turns, ring_db = drive_line()
    background = shore() + trickle()
    driving = truck(speed, turns, ring_db) + squeals() + whistle(speed, turns) + scrub()
    return ports(background + driving + grit() + knocks())


CUTOFF_HZ = 15730


def record(dry):
    """The top is cut by a steep elliptic low-pass."""
    return signal.sosfilt(signal.ellip(10, .5, 60, CUTOFF_HZ, fs=SR, output="sos"), dry)


dry = scene()
out = record(dry)
put_to_file(out)
```